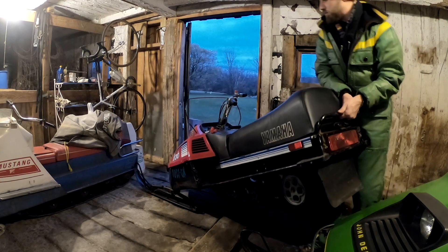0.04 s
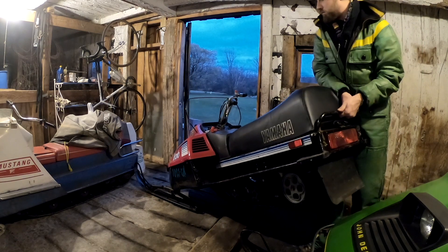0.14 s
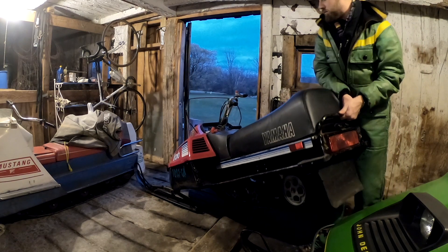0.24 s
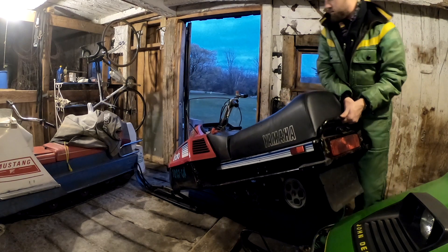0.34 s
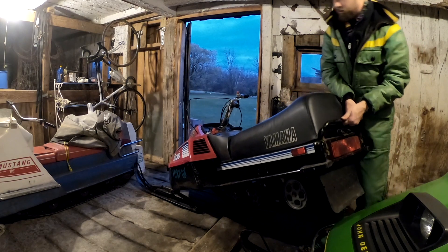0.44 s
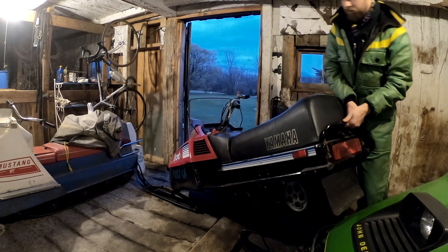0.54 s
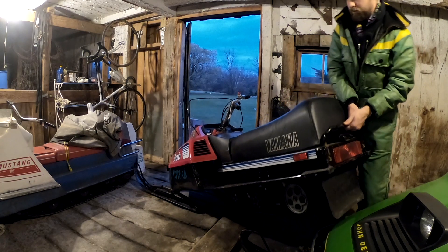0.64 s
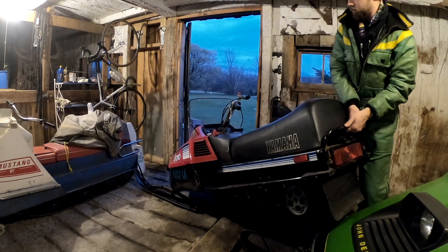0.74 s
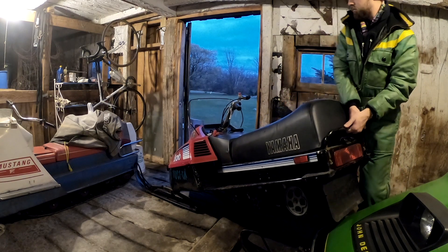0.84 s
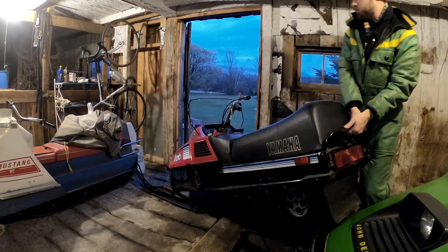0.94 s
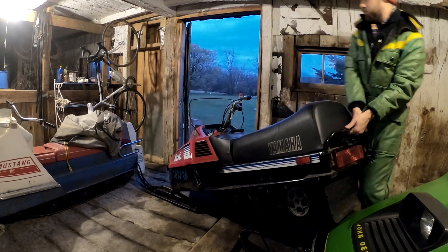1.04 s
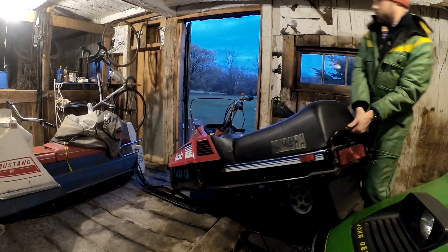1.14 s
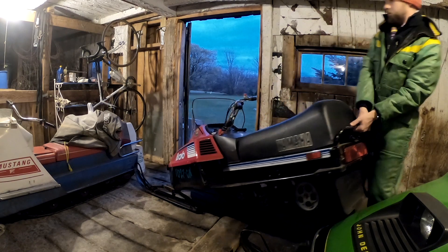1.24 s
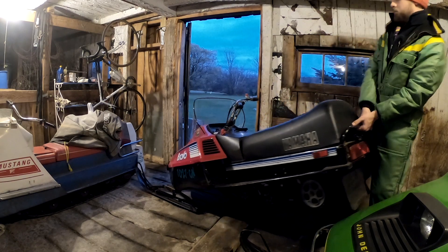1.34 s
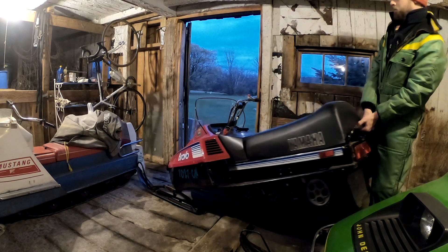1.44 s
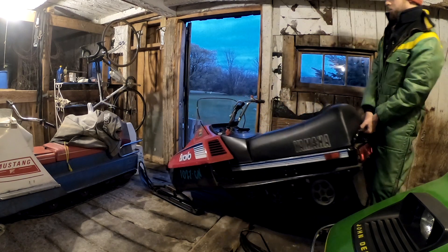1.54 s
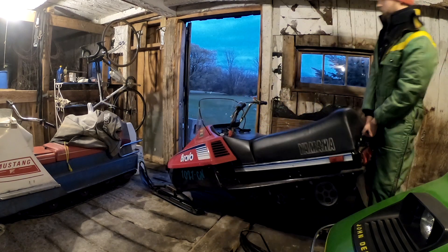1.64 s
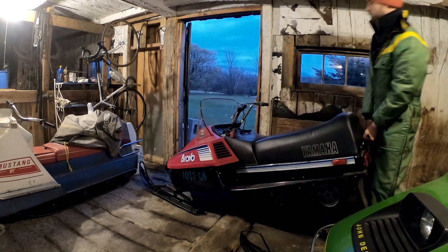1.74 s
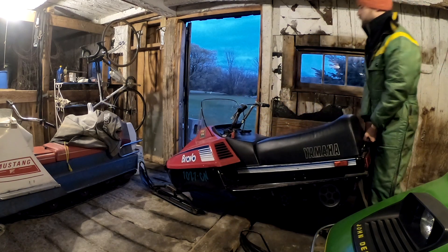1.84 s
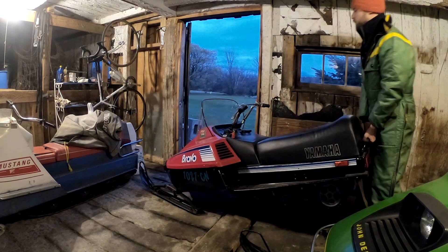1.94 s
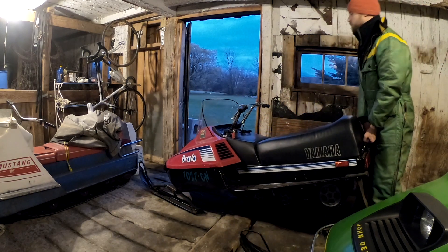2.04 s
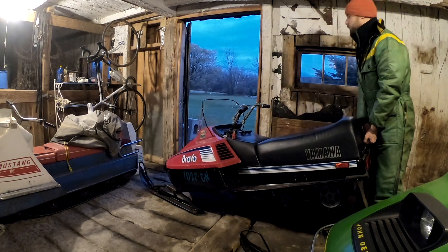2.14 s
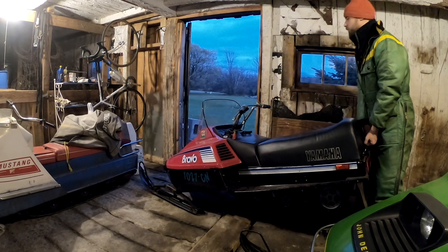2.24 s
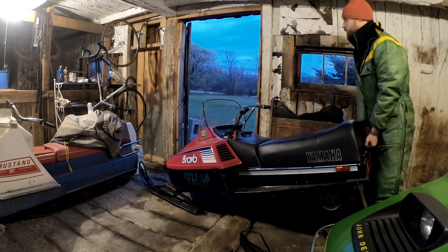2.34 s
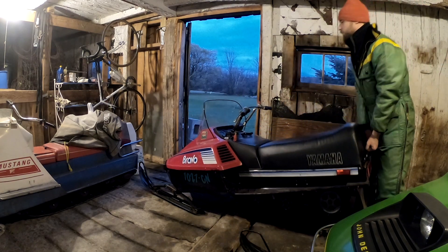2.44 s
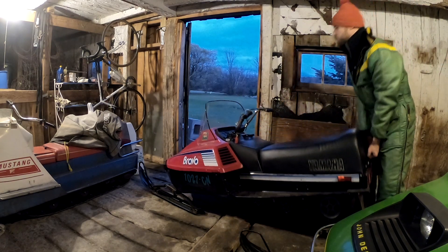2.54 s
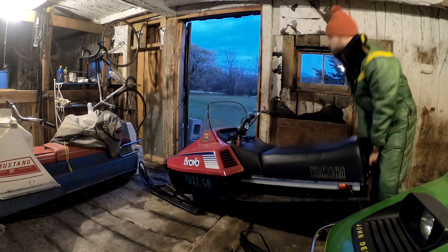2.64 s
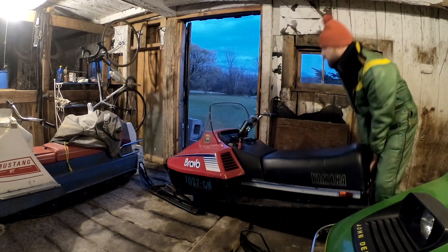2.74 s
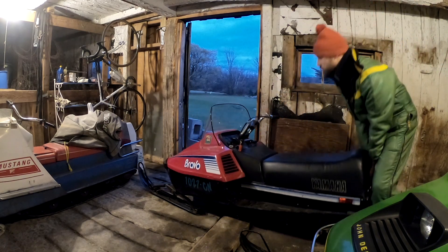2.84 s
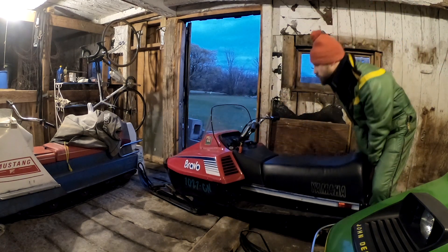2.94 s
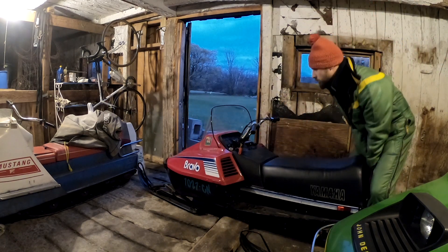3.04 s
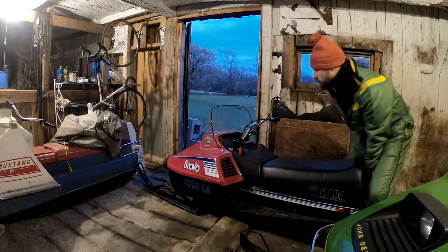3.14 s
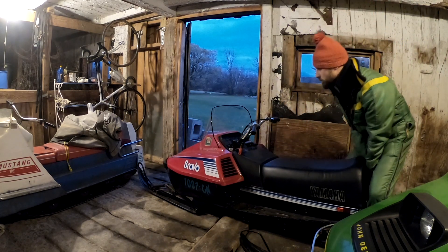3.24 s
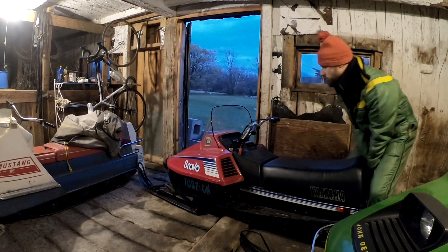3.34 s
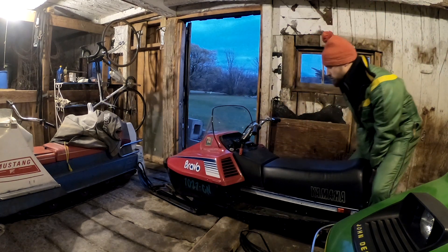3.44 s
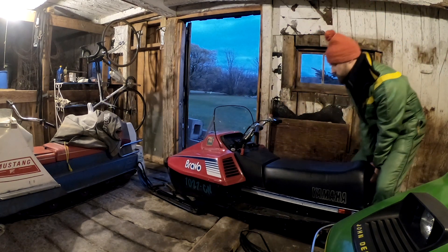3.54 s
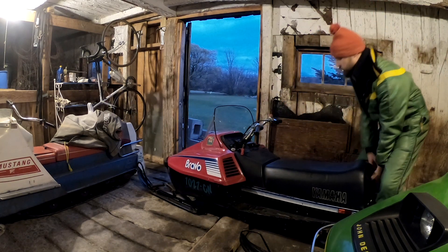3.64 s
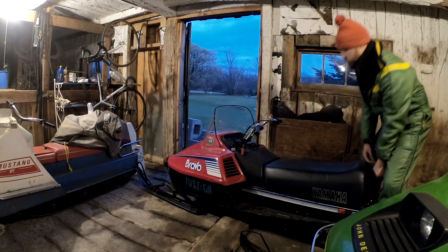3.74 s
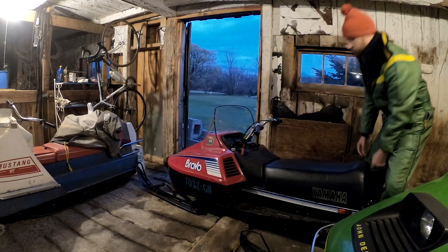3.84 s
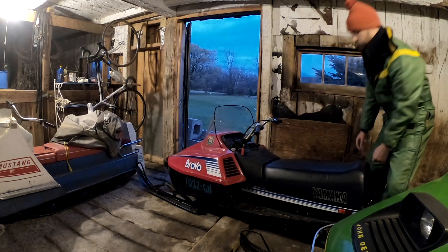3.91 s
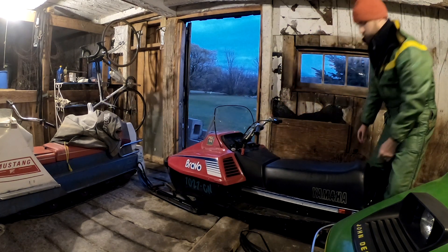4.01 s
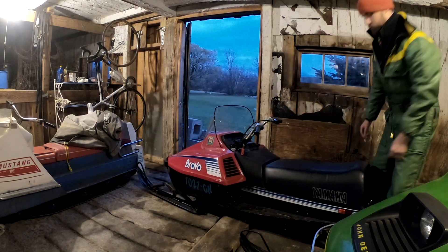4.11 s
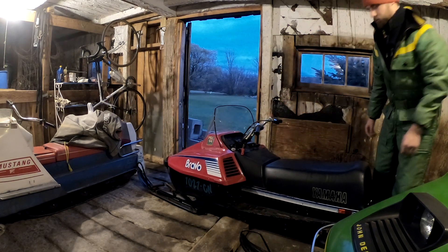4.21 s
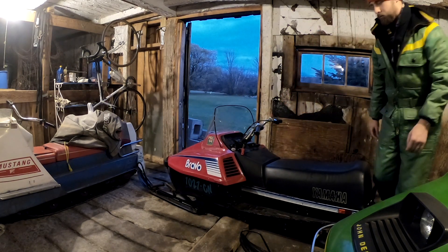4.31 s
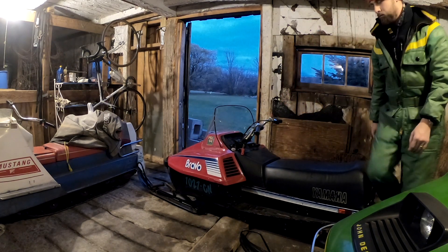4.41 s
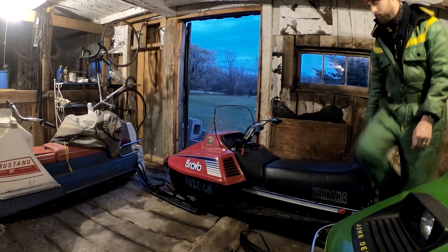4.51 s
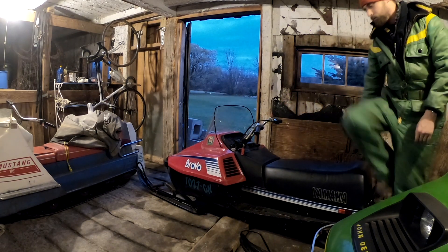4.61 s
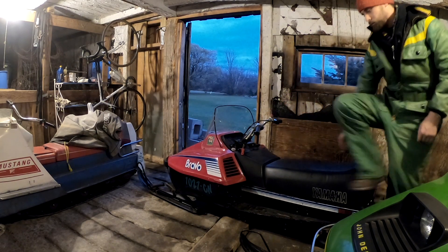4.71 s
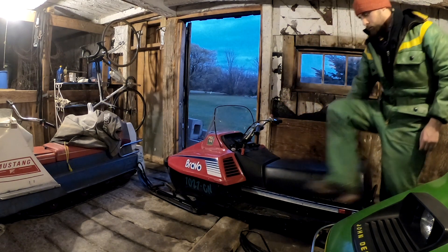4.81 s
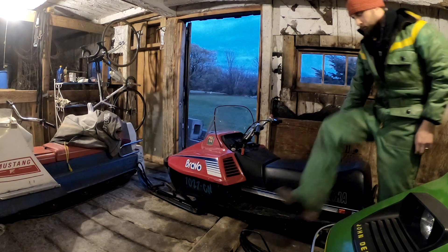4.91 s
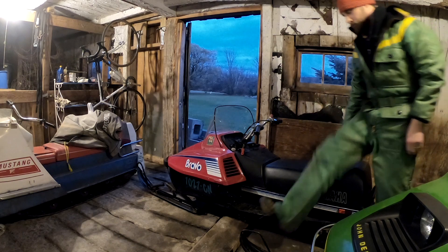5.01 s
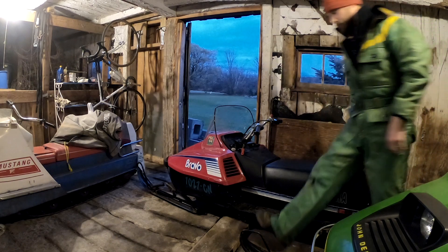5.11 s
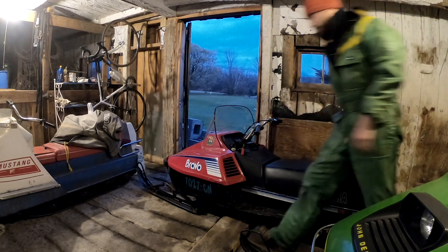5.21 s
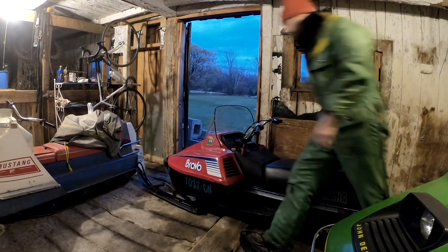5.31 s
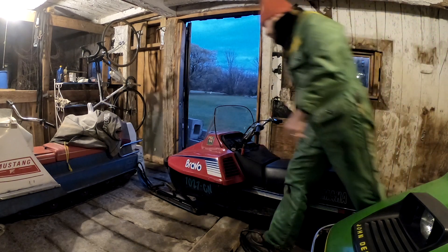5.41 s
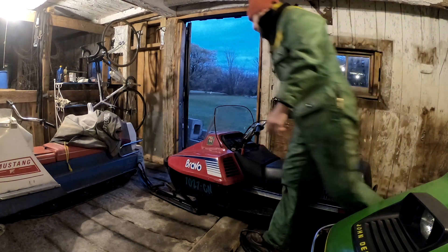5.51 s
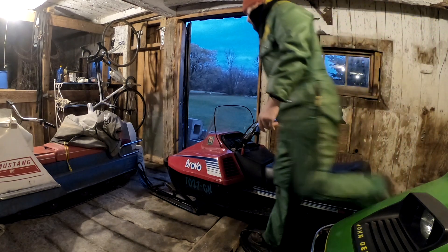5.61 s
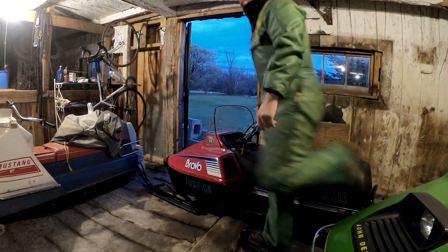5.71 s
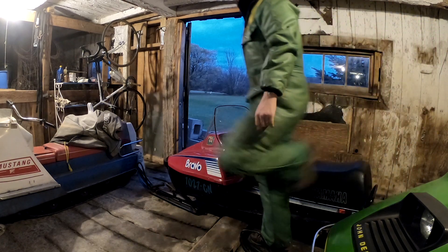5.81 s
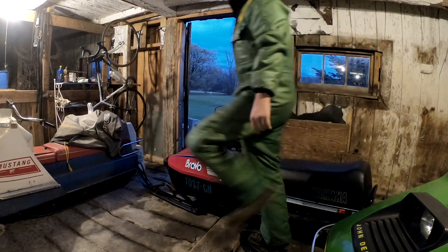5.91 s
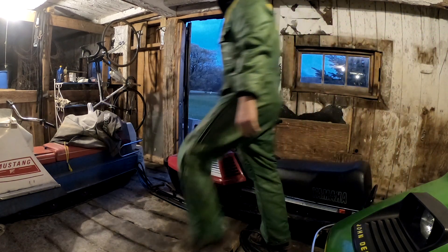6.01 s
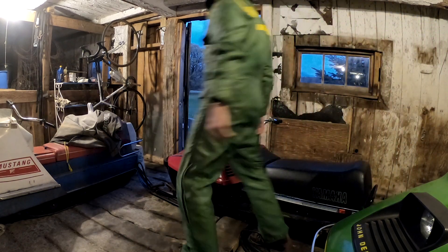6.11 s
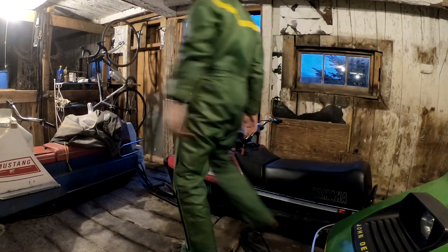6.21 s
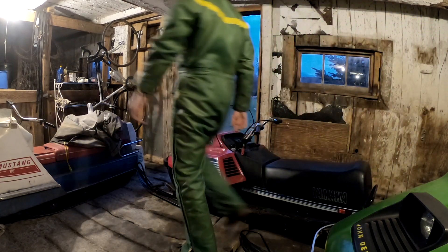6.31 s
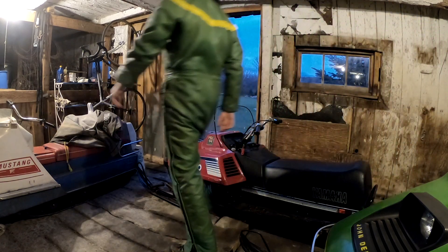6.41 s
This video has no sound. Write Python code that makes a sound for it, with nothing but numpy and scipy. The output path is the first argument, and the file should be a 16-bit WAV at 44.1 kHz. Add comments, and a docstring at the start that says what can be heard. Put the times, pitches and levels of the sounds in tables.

```python
"""Sled dragged across a barn floor

A heavy sled is dragged by its tail over loose floorboards, set down, and stepped over.
Slipping skis shake plank and board modes into groans; shifting weight shakes the joists into rumble.
Banded clicks make grit and cloth rasp and ski chatter. Boots scuff in noise bursts and knock as soft
pushes, a boot cracks against the sled, its shell rattles, a last heavy step booms through the floor.
Feedback delays give the barn's echo of the blows, over a faint noise hush."""
import sys
import numpy as np
from scipy import signal
from scipy.fft import rfft, irfft, next_fast_len
from scipy.io import wavfile
from scipy.ndimage import uniform_filter1d

SR = 44100
rng = np.random.default_rng(int(sys.argv[2]) if len(sys.argv) > 2 else 0)


def master_out(mix):
    """Clip the mix to full scale and print it as 16-bit PCM to the path in sys.argv[1]."""
    frames = np.transpose(np.atleast_2d(mix))
    ceiling = np.clip(frames, -1, 1)
    pcm = np.round(ceiling * 32767).astype(np.int16)
    wavfile.write(sys.argv[1], SR, pcm)


N = 284886

# shorter floorboard modes: mode_hz, level_db, t60_s
BOARD_MODES = [(206.4, -1, 0.27), (230.1, -2.5, 0.21), (256.2, 3.5, 0.15), (293, 3, 0.088),
               (336.8, -4, 0.13), (380.7, -8.5, 0.15), (419.4, -8.5, 0.13), (488.5, -18.5, 0.39),
               (646, -7.5, 0.033)]
# surface friction: time_s, rasp_db, chatter_db
FRICTION = [(0.0, -58, -57), (0.3, -62, -65), (0.97, -61.5, -63), (1.15, -57, -59), (1.31, -47, -49.5),
            (1.56, -48.5, -45), (1.89, -54, -55.5), (2.1, -83, -67), (2.37, -72.5, -78), (2.6, -56.5, -57),
            (3.13, -54, -57), (3.24, -61, -56), (3.33, -86, -79), (3.49, -64.5, -62.5), (3.63, -40.5, -46),
            (3.74, -57.5, -57.5), (3.94, -75, -67.5), (4.21, -65.5, -74), (4.57, -56.5, -58),
            (4.75, -55.5, -55), (4.89, -63.5, -73), (5.13, -60, -62), (5.67, -64, -64.5), (6.46, -61, -66)]


def from_db(db):
    """Decibels to gain."""
    return 10 ** (np.asarray(db) / 20)


def power_db(power):
    """Power to decibels."""
    return 10 * np.log10(power)


def rms_one(x):
    """Scale to unit rms."""
    return x / np.sqrt(np.mean(x ** 2) + 1e-20)


def at_hz(points, hz):
    """Read a spectrum on a log-frequency axis."""
    points_hz, values = np.transpose(points)
    return np.interp(np.log(hz), np.log(points_hz), values)


def in_time(rows):
    """Interpolate curve columns to every sample."""
    time_s, *columns = np.transpose(rows)
    return [np.interp(np.arange(N) / SR, time_s, column) for column in columns]


def swells(peak_s, level_db, rise_s, fade_s):
    """Power-sum, in dB, of swells that rise and fade 20 dB in the given times (0.01 s at least)."""
    step = np.arange(0, N, 40)
    since_s = step / SR - np.reshape(peak_s, (-1, 1))
    rise_s = np.reshape(np.maximum(rise_s, .01), (-1, 1))
    fade_s = np.reshape(np.maximum(fade_s, .01), (-1, 1))
    each_db = np.reshape(level_db, (-1, 1)) - 20 * np.maximum(since_s / fade_s, -since_s / rise_s)
    total_db = power_db(np.sum(from_db(each_db) ** 2, axis=0) + 1e-12)
    return np.interp(np.arange(N), step, total_db)


def drift(corner_hz):
    """Slow chance of spread 1: noise through a double pole, one value per 40 samples."""
    r = np.exp(-2 * np.pi * corner_hz * 40 / SR)
    noise = rng.standard_normal(N // 40 + 2002)
    slow = signal.lfilter([1], [1, -2 * r, r * r], noise)[2000:]  # settled part
    return np.interp(np.arange(N) / 40, np.arange(len(slow)), rms_one(slow))


def grains(per_s, spread_db, channels=1):
    """Random signed clicks of uneven size; rms 1."""
    shape = (channels, N)
    sizes = from_db(spread_db * np.minimum(rng.exponential(1, shape), 4))
    signs = rng.choice([-1, 1], shape)
    return rms_one(sizes * signs * (rng.random(shape) < per_s / SR))


def ring(force, modes):
    """A body's modes: damped sines that each click excites to the mode's own height."""
    out = 0
    for mode_hz, level_db, t60_s in modes:
        r, w = from_db(-60 / (t60_s * SR)), 2 * np.pi * mode_hz / SR
        rise, decay = [0, from_db(level_db) * np.sin(w)], [1, -2 * r * np.cos(w), r * r]
        out = out + signal.lfilter(rise, decay, force + 1e-18)
    return out


def highpass(x, corner_hz):
    """Steep fourth-order high-pass."""
    return signal.sosfilt(signal.butter(4, corner_hz, "high", fs=SR, output="sos"), x)


def panned(x, pan_db):
    """Share a left-right difference between the channels."""
    return x * from_db(np.array([pan_db / 2, -pan_db / 2])).reshape(2, -1)


def coloured(source, spectrum, patchy_db):
    """Four streams through half-octave bands with own level, flicker and stereo likeness; rms 1."""
    # centre_hz, left-right likeness (1 same, -1 opposite)
    likeness = [(30, 0.09), (150, 0.18), (500, -0.85), (1000, -0.31), (2400, 0.61), (5000, 0.54),
                (9000, -0.23)]
    out, edges_hz = 0, 20 * 2 ** np.arange(0, 10, .5)
    for k, (low_hz, high_hz) in enumerate(zip(edges_hz, edges_hz[1:])):
        centre_hz = np.sqrt(low_hz * high_hz)
        pair = source[2 * (k % 2):2 * (k % 2) + 2]  # neighbouring bands use different streams
        band = signal.butter(2, [low_hz, high_hz], "band", fs=SR, output="sos")
        mid, side = signal.sosfilt(band, pair)
        alike = at_hz(likeness, centre_hz)
        gain = from_db(at_hz(spectrum, centre_hz) + patchy_db * drift(11.8))
        out = out + gain * (np.sqrt(1 + alike) * mid + np.sqrt(1 - alike) * side * [[1], [-1]])
    return rms_one(out)


def floor_drive(level_db, modes, per_s, alike, low_hz):
    """Uneven slips shake a wooden body's modes; each ear hears its own patch of floor."""
    evenness = 0.55  # 0 leaves the shaking lumpy, 1 holds it level
    mid, side = highpass(ring(grains(per_s, 1.52, channels=2), modes), low_hz)
    short_power = uniform_filter1d(rms_one(mid) ** 2, size=SR // 30)
    mid = mid / (short_power + .05) ** (evenness / 2)
    side = (1 - alike) * side
    return from_db(level_db) * rms_one(np.array([mid + side, mid - side]))


def under_load(steady_db, column):
    """The pull comes in lumps, with passing loads, some sudden and some slow, power-added; in dB."""
    # peak_s, plank_db, boards_db, rise_20db_s, fade_20db_s
    loads = np.transpose([(0.094, -34, -41, 0.1, 0.04), (0.269, -31, -66, 0.24, 0.2),
                          (1.479, -29, -58, 0.3, 0.21), (1.64, -27, -34, -0.02, 0.23),
                          (1.687, -20, -35, 0.06, 0.0846), (1.99, -46, -50, -0.1, 0.36),
                          (2.374, -43.5, -47.5, 0.07, 0.47), (3.11, -36.5, -44, 0.15, 0.49),
                          (3.468, -40, -43, -0.3, 0.17), (3.602, -39, -29.5, 0.1, 0.23),
                          (3.639, -20.5, -44, 0.05, 0.0141), (3.742, -29, -58, 0.12, -0.02),
                          (3.835, -38, -45.5, -0.12, 0.14), (4.56, -61, -48, 0.22, 0.48),
                          (4.784, -75, -32, 0.0449, 0.03), (5.219, -50, -36.5, 0.03, 0.23),
                          (5.271, -38.5, -33, 0.005, 0.1449), (5.592, -57, -40, -0.04, 0.23),
                          (5.975, -61, -46.5, 0.06, 0.14), (6.154, -44.5, -32.5, -0.01, 0.23),
                          (6.206, -7, -24, -0.0357, -0.07)])
    lumps_db, lumps_hz = 3.5, 6.6
    lumpy_db = steady_db + lumps_db * drift(lumps_hz)
    loads_db = swells(loads[0], loads[column], loads[3], loads[4])
    return power_db(from_db(lumpy_db) ** 2 + from_db(loads_db) ** 2)


def board_groan():
    """Slips under pull and tread shake the long plank under the sled and the shorter boards."""
    # steady pull and tread: time_s, plank_db, boards_db
    drag = [(0, -45, -46), (.5, -55.5, -55), (.9, -62, -63), (1.04, -50, -55), (1.22, -55, -55),
            (1.4, -43, -38.5), (1.75, -47, -39), (1.87, -53, -47), (2.1, -58, -55), (2.34, -61, -67),
            (2.55, -63, -60), (2.79, -58, -54), (3.05, -34, -39.5), (3.36, -60, -69), (3.94, -50, -59),
            (4.2, -68.5, -65.5), (4.45, -68.5, -76), (5.15, -71.5, -59.5), (5.56, -66, -77),
            (5.76, -68, -55.5), (6.12, -70, -63.5)]
    # mode_hz, level_db, t60_s
    plank_modes = [(157, -10.5, 0.35), (160.9, -7.5, 0.36)]
    plank_db, boards_db = in_time(drag)
    plank_db, boards_db = under_load(plank_db, column=1), under_load(boards_db, column=2)
    plank = floor_drive(plank_db, plank_modes, 200, alike=0.6, low_hz=152)
    return plank + floor_drive(boards_db, BOARD_MODES, 300, alike=0.3, low_hz=163)


def joist_rumble():
    """Weight landing on the joists swells their low modes."""
    # peak_s, level_db
    weight = [(.05, -42.5), (.278, -53), (1.38, -33), (1.53, -29), (1.696, -33.5), (1.82, -41), (3.12, -43),
              (3.666, -47), (5.278, -59), (6.268, -19)]
    # mode_hz, level_db, t60_s
    joist_modes = [(55.3, -4, 0.36), (73.2, -0.5, 0.62), (89.5, -2, 0.19), (113, 1.5, 0.17)]
    rise_20db_s, fade_20db_s = 0.075, 0.14
    rest_db = -83  # never quite still
    rumble_db = np.maximum(swells(*np.transpose(weight), rise_20db_s, fade_20db_s), rest_db)
    return floor_drive(rumble_db, joist_modes, 100, alike=0.24, low_hz=54.3)


def grit_rasp():
    """Grit and cloth rub as dense clicks in a broad band."""
    # band_hz, level_db_per_hz (relative)
    rasp_spectrum = [(900, -5), (1500, -2.5), (2600, 2.5), (4300, -9), (6200, -3.5), (9000, -14),
                     (15000, -16)]
    rasp_db, _ = in_time(FRICTION)
    return from_db(rasp_db) * coloured(grains(9000, 1.0, channels=4), rasp_spectrum, patchy_db=2.0)


def ski_chatter():
    """Skis chatter as sparser clicks, strongest in the middle range."""
    # band_hz, level_db_per_hz (relative)
    chatter_spectrum = [(300, -28), (600, -2), (850, 7.5), (1250, 0), (1700, 2), (2400, -18)]
    _, chatter_db = in_time(FRICTION)
    return from_db(chatter_db) * coloured(grains(2500, 1.0, channels=4), chatter_spectrum, patchy_db=1.5)


def gritty_bursts(rows):
    """Noise bursts in own bands: quick rise, exponential fall, level broken up by chance."""
    grit_power = 0.57  # 0 is smooth hiss, 1 is crackly
    chop_db, chops_per_s = 2.5, 91.4
    side_db, side_hz = 0.5, 6000  # stereo spread wide in the treble
    out, t = np.zeros((2, N + SR)), np.arange(SR // 2) / SR
    wide = signal.butter(1, side_hz, "high", fs=SR, output="sos")
    for start_s, level_db, centre_hz, octaves, rise_s, t60_s, pan_db in rows:
        half = 2 ** (np.clip(octaves, .1, 4) / 2)
        band_hz = [centre_hz / half, min(centre_hz * half, .45 * SR)]
        band = signal.butter(2, band_hz, "band", fs=SR, output="sos")
        grit = rng.standard_normal((2, len(t))) * rng.exponential(1, len(t)) ** grit_power
        mid, side = rms_one(signal.sosfilt(band, grit))
        side = from_db(side_db) * signal.sosfilt(wide, side)
        shape = (1 - np.exp(-t / rise_s)) ** 2 * from_db(level_db - 60 * t / t60_s) / 2
        catches = np.r_[0, 0, rng.standard_normal(200)]  # first contact stays whole
        shape = shape * from_db(chop_db * np.interp(t * chops_per_s, np.arange(len(catches)), catches))
        at = round(start_s * SR)
        out[:, at:at + len(t)] += panned(np.array([mid + side, mid - side]) * shape, pan_db)
    return out[:, :N]


def scuffs():
    """Boot and ski scuffs as centred gritty bursts, chopped as the grit catches and lets go."""
    # start_s, level_db, centre_hz, width_octaves (4 at most), rise_ms, t60_s
    scuff_rows = [(0.054, -32.5, 1870, 2.77, 2.7, 0.35), (0.171, -37, 2490, 1.7, 5.4, 0.14),
                  (.985, -46, 2040, 2.3, 4.3, 0.7), (1.32, -29.5, 1090, 2.3, 5.6, 0.36),
                  (1.59, -29, 3760, 1.54, 12, 0.37), (1.896, -43.5, 2220, 1.75, 3, 0.73),
                  (3.191, -34, 1890, 1.2, 1.4, 0.2), (2.988, -37.5, 2970, 1.3, 3.1, 0.069),
                  (3.447, -41, 1850, 0.67, 2.1, 0.17), (3.581, -31, 1390, 2.2, 3.8, 0.14),
                  (3.617, -25, 1310, 1.64, 1.8, 0.15), (3.822, -46.5, 1600, 3.4, 1.9, 0.45),
                  (4.49, -43.5, 2770, 2.9, 21, 0.97), (4.76, -39, 1500, 6.3, 6.3, 0.5),
                  (5.194, -6.5, 3280, 1.8, 3.3, 0.048), (5.193, -21, 2580, 3.6, 3.3, 0.39),
                  (5.201, -11.5, 5600, 1.4, 1.1, 0.032), (5.579, -34.5, 6000, 1.1, 2.8, 0.23),
                  (5.942, -34.5, 2380, 3.26, 6.9, 0.17), (6.147, -42.5, 890, 2.2, 0.5, 0.37)]
    return gritty_bursts([(start_s, level_db, hz, octaves, rise_ms / 1000, t60_s, 0)
                          for start_s, level_db, hz, octaves, rise_ms, t60_s in scuff_rows])


def judders_and_squeaks():
    """Short narrow-band judders and squeaks, from the skis and rubbing cloth, left of centre."""
    # start_s, level_db, centre_hz, t60_s
    judder_rows = [(1.375, -27, 1150, 0.066), (1.443, -27.5, 1130, 0.075), (1.578, -32, 1194, 0.68),
                   (1.9, -43, 1380, 0.37), (2.0, -47.5, 1310, 0.29), (2.998, -32, 1170, 0.093),
                   (3.092, -36, 1300, 0.14), (3.137, -33, 1220, 0.084), (3.841, -37, 1220, 0.089),
                   (4.538, -45.5, 2850, 0.44), (4.727, -41.5, 1270, 0.28), (4.784, -40.5, 1630, 0.15)]
    octaves, rise_s, pan_db = 0.42, 0.0028, 4
    return gritty_bursts([(start_s, level_db, hz, octaves, rise_s, t60_s, pan_db)
                          for start_s, level_db, hz, t60_s in judder_rows])


def sled_thuds():
    """The jarred hollow sled body sounds as three noise bands at multiples of its pitch."""
    # start_s, level_db, pitch_hz, t60_s
    thud_rows = [(1.33, -31, 370, 0.45), (1.6, -30, 471, 0.53), (3.59, -16.5, 421, 0.27),
                 (3.655, -22, 411, 0.17), (5.199, -33.5, 560, 0.28), (6.182, -15, 464, 0.15)]
    # pitch_multiple, level_db, width_octaves
    hollow_bands = [(1.0, 0.5, 0.33), (1.8, -9.5, 0.34), (2.6, -17, 0.35)]
    rise_s, pan_db = 0.0085, 0.5
    return gritty_bursts([(start_s, level_db + band_db, pitch_hz * multiple, octaves, rise_s, t60_s, pan_db)
                          for start_s, level_db, pitch_hz, t60_s in thud_rows
                          for multiple, band_db, octaves in hollow_bands])


def track_bumps():
    """The track's lugs settle on the boards one after another at a nearly even pace; knock rows."""
    # start_s, level_db
    [(start_s, level_db)] = [(3.06, -8.5)]
    gap_s, contact_ms = 0.025, 1.43
    return [(start_s + gap_s * k + 0.00097 * late, level_db + 1.7 * louder, contact_ms)
            for k, (late, louder) in enumerate(rng.normal(0, 1, (5, 2)))]


def knocks():
    """Soft pushes ring the boards and make the floor give: a longer contact is duller."""
    # start_s, level_db, contact_ms (time constant, 0.05 at least)
    knock_rows = [(0.084, -22, 0.61), (0.206, -26, 0.55), (1.338, -11, 0.75), (1.683, -13, 1.05),
                  (1.973, -28, 0.8), (2.05, -23, 1.8), (2.125, -23, 1.46), (2.361, -26, 0.38),
                  (3.005, -24.5, 0.041), (3.169, -11, 0.87), (3.463, -38, 0.64), (3.594, -22.5, 0.22),
                  (3.626, -12.5, 0.4), (3.822, -28, 0.23), (5.27, -20.5, 0.29), (5.585, -32.5, 0.17),
                  (5.962, -39.5, 0.14), (6.147, -21.5, 0.044), (6.191, -3.5, 0.15), (6.199, -5.5, 1.5),
                  (6.237, -6, 0.58), (6.267, -2, 1.55)]
    # the floor giving: mode_hz, level_db, t60_s
    thump_modes = [(158.5, -17, 0.15)]
    force, t = np.zeros(N + SR), np.arange(800) / SR
    for start_s, level_db, contact_ms in knock_rows + track_bumps():
        push = t * np.exp(-t / max(contact_ms / 1000, 5e-5))
        at = round(start_s * SR)
        force[at:at + len(t)] += from_db(level_db) * push / push.sum()
    force = force[:N]
    return highpass(from_db(-17.0) * ring(force, BOARD_MODES) + ring(force, thump_modes), 95)


def shell_rattles():
    """Loose parts click on the sled's shell, dying after each blow; each mode has its own clicks."""
    # start_s, level_db, t60_s
    rattle_rows = [(3.191, -41.5, 0.12), (5.202, -19, .2), (5.264, -28, 0.24), (5.582, -41.5, 0.32),
                   (5.953, -48, 0.097)]
    # mode_hz, level_db
    shell_modes = [(958, -2), (1820, -3), (2030, -4.5), (2450, 0.5), (2750, -1), (3045, -3), (3440, -12.5),
                   (4625, -11), (5965, -3), (7170, -5.5)]
    per_s, shell_t60_s = 500, 0.033
    start_s, level_db, t60_s = np.transpose(rattle_rows)
    shaking = from_db(swells(start_s, level_db, 0 * start_s, t60_s / 3))
    clicks = grains(per_s, 3.3, channels=len(shell_modes)) * np.sqrt(per_s / SR)
    rung = [ring(shaking * own, [(*mode, shell_t60_s)]) for own, mode in zip(clicks, shell_modes)]
    return sum(rung) / 4


def barn(x):
    """Eight feedback delays a side, duller on every round."""
    t60_s, wall_cut_hz = 0.26, 1930
    size = next_fast_len(N + SR)
    w = 2 * np.pi * np.arange(size // 2 + 1) / size
    dull = 1 / (1 + 1j * w * SR / (2 * np.pi * wall_cut_hz))
    walls = np.zeros((2, len(w)), complex)
    for k, lag in enumerate((rng.uniform(.011, 0.036, 16) * SR).astype(int)):
        loop = from_db(-60 * lag / SR / t60_s) * dull * np.exp(-1j * w * lag)
        walls[k % 2] += loop / (1 - loop) * (-1) ** (k // 2)
    return irfft(walls * rfft(x, size), size)[:, :N]


def barn_hush():
    """Faint coloured noise, flickering slightly band by band."""
    # band_hz, level_db_per_hz (relative)
    air_spectrum = [(20, 4.5), (32, 15.5), (45, 4), (100, -34), (200, -10), (600, 4), (2000, -29),
                    (6000, -20)]
    return from_db(-65.5) * coloured(rng.standard_normal((4, N)), air_spectrum, patchy_db=1.2)


def scene():
    """Dragging, steps and blows in the barn."""
    drag = board_groan() + joist_rumble() + grit_rasp() + ski_chatter()
    blows = knocks() + scuffs() + judders_and_squeaks() + sled_thuds() + shell_rattles()
    echo = from_db(-5) * barn(blows.mean(0))
    return drag + blows + echo + barn_hush()


def record(dry):
    """The microphone falls away above its resonance, its ports differ a little; the top is cut steeply."""
    # microphone colour: band_hz, level_db
    mic_colour = [(20, -3), (7300, 4.5), (8200, -4), (11000, -8.5), (15000, -13)]
    # the two microphone ports: band_hz, left_minus_right_db
    port_lean = [(60, 0), (130, 2), (400, 0), (1410, -4.5), (3100, -2.5), (6820, 1)]
    cutoff_hz = 16200
    hz = np.linspace(0, SR / 2, 129)
    mic_db, lean_db = at_hz(mic_colour, hz + 1), at_hz(port_lean, hz + 1) / 2
    colour = [signal.firwin2(129, hz, from_db(mic_db + d), fs=SR) for d in (lean_db, -lean_db)]
    heard = signal.oaconvolve(dry, colour, "same", axes=1)
    return signal.sosfilt(signal.cheby2(12, 70, cutoff_hz, fs=SR, output="sos"), heard)


dry = scene()
out = record(dry)
master_out(out)
```